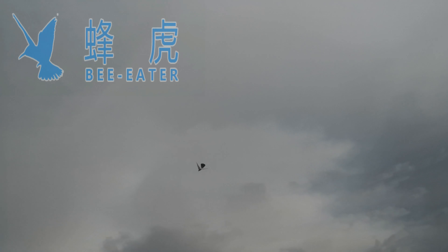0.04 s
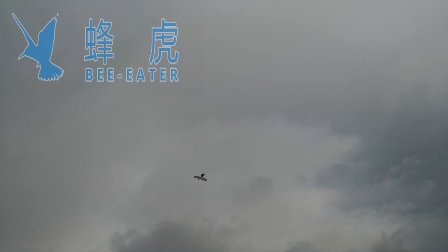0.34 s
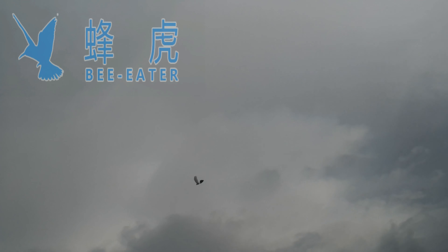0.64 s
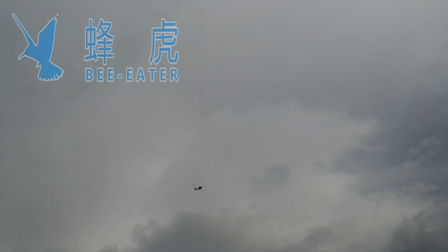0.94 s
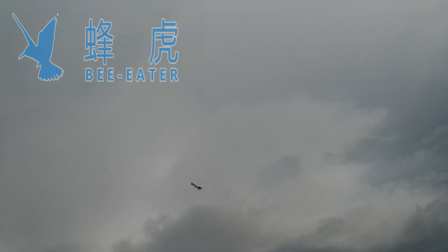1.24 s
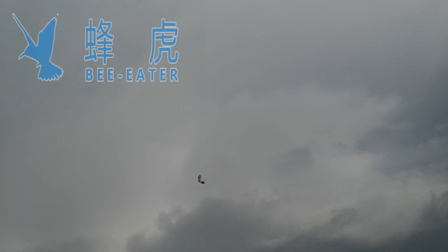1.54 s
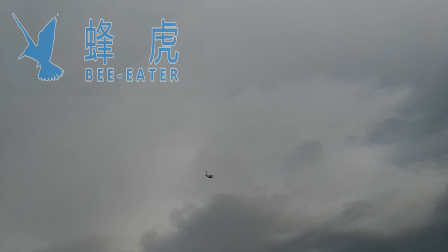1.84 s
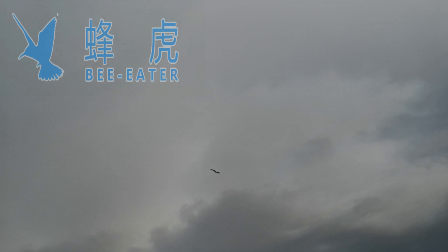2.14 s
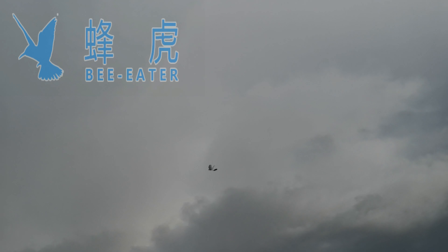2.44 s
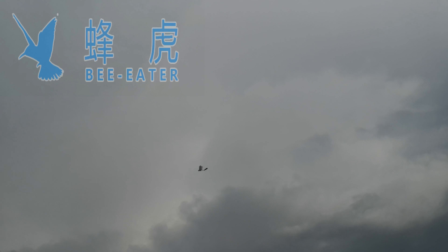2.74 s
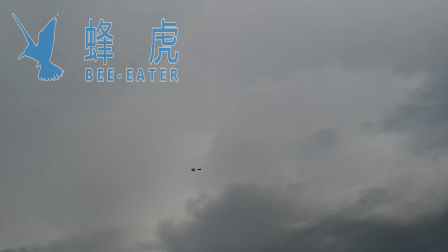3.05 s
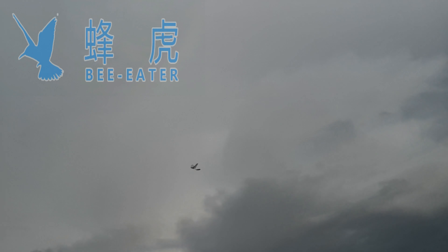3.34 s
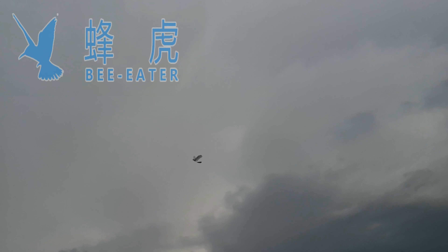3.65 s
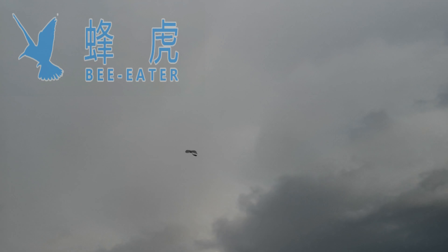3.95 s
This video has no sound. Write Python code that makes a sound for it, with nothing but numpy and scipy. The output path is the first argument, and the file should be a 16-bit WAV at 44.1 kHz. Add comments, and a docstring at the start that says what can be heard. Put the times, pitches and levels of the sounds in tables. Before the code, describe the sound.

Pulsing gear whirr of a small wing-flapping flying machine, with low wind rumble outdoors.

```python
"""A small flapping-wing aircraft flies away under an open sky, over a faint outdoor hiss.
At first, wind rumbles and thumps on the microphone while the wings beat five or six times a second.
With each stroke the gears whine, rattle and slow under the load, and the wing film swishes and crackles.
The aircraft grows fainter, and a second gust comes at about 2 s. Just after 3 s the film snaps taut,
and toward the end the gears run a little faster and the aircraft sounds louder again."""
import sys
import numpy as np
from scipy import signal
from scipy.fft import rfft, irfft
from scipy.io import wavfile
from scipy.ndimage import uniform_filter1d

SR = 44100
rng = np.random.default_rng(int(sys.argv[2]) if len(sys.argv) > 2 else 0)


def master(y):
    """Save y as 16-bit WAV."""
    cut = np.clip(np.atleast_2d(y).T, -1, 1)
    pcm = np.round(cut * 32767)  # scale
    wavfile.write(sys.argv[1], SR, pcm.astype(np.int16))


N = 176400
TIME = np.arange(N) / SR
HZ = np.maximum(np.arange(N // 2 + 1) * SR / N, 1)

# how alike the left and right channels are: (frequency [Hz], likeness [0 to 1])
LIKENESS = [(60, 1), (150, 0.92), (300, 0.73), (600, 0.12), (1200, 0.71), (2500, 0.8), (4000, 0.56),
            (6000, 0.83), (12000, 0.12)]
# the faint outdoor hiss: (frequency [Hz], level [dB])
AIR_COLOUR = [(100, 2.5), (250, 1.5), (400, -7), (700, -9.5), (1500, -7.5), (4000, -18.5), (10000, -50)]
# how hard the wind blows on the microphone: (time [s], rumble level [dB], buffeting level [dB])
GUSTS = [(0, -37.5, -44), (.8, -44.5, -52), (1.8, -49, -56.5), (2.15, -41.5, -53.5), (3.1, -48, -56.5),
         (4, -46.5, -52.5)]
# the wind's deep rumble: (frequency [Hz], level [dB])
RUMBLE_COLOUR = [(12, -16), (25, -5.5), (40, 3), (55, 1), (80, -1), (110, -16), (200, -54)]
# the wind's higher buffeting: (frequency [Hz], level [dB])
BUFFET_COLOUR = [(50, -29), (90, 2.5), (150, -3), (200, -10), (260, -16.5), (400, -22.5), (900, -75)]
# short gusts that thump on the microphone: (time [s], level [dB])
THUMPS = [(0.061, -39), (0.154, -29), (0.242, -32.5), (0.342, -35.5), (.49, -44.5), (0.854, -41.5),
          (1.815, -47)]
# the dull sound of a thump: (frequency [Hz], level [dB])
THUMP_COLOUR = [(45, 8), (170, 0), (450, -38.5), (3000, -77)]

# the ground echo's delay, shrinking as the aircraft gets lower in the sky: (time [s], delay [ms])
ECHO_DELAY = [(0, 6.73), (.6, 6.14), (1, 5.83), (1.4, 5.67), (1.8, 5.62), (2.8, 5.67), (3.5, 5.55),
              (4, 5.74)]
# how much sound the ground sends back: (frequency [Hz], share [0 to 1])
ECHO_SHARE = [(500, 1), (2000, 0.45), (5000, 0.64), (12000, 0.085)]
# how much louder the aircraft is on the left: (frequency [Hz], left minus right [dB])
BALANCE = [(500, -2), (1150, -1.5), (1650, 0), (2400, 1.5), (3000, 1.5), (3500, -1.5), (4100, 1),
           (4700, -8), (5300, -6), (6000, -9), (6700, -6.5), (7400, 2.5), (9000, 2.5), (12000, 0)]

# the wing beats, each starting at the slowest moment of the power stroke:
# (time [s], gear level [dB], swish level [dB], level of the meshing tone's octave [dB])
BEATS = [(-.019, -49.5, -44, -57), (.17, -49, -46.5, -68), (.346, -48, -48.5, -57.5),
         (.527, -47, -52, -57.5), (.71, -47.5, -55, -58), (.887, -48.5, -56, -59), (1.069, -51.5, -54, -61),
         (1.25, -52.5, -55.5, -59.5), (1.43, -51.5, -60, -60.5), (1.608, -52, -63, -62),
         (1.788, -53.5, -54.5, -61), (1.971, -54, -57.5, -58.5), (2.151, -51.5, -54.5, -67.5),
         (2.334, -56, -54.5, -69), (2.513, -52, -53.5, -60.5), (2.693, -52, -58, -65),
         (2.87, -52, -61, -66), (3.047, -51.5, -59, -76), (3.223, -55, -56, -69.5),
         (3.398, -52, -54.5, -71), (3.575, -52, -59, -64), (3.753, -50, -52, -62), (3.93, -48.5, -51, -56),
         (4.11, -51, -54, -68)]
# loudness through one beat: (place in the beat [0 to 1], gear change [dB], swish change [dB])
STROKE_LOAD = [(0, 3.5, -3), (.16, 7.5, -4.5), (.3, 0.5, -8.5), (.47, 7.5, -6.5), (.62, 5.5, -1),
               (.77, 7, -0.5), (.9, 5, -5)]
# the swish of the wing film: (frequency [Hz], level [dB])
SWISH_COLOUR = [(600, -14.5), (1240, -6.5), (1540, -10.5), (2370, -9), (3060, 2.5), (4710, -9.5),
                (5320, -18.5), (6960, -35), (8180, -26), (15000, -42)]
# the film's thin, high hiss: (frequency [Hz], level [dB])
HISS_COLOUR = [(3000, -5.5), (5700, 0.5), (6500, -5), (8300, -11.5), (9400, -6), (10500, -19), (15000, -38)]
# the slow rise and fall of that hiss: (time [s], level [dB])
HISS_LEVEL = [(0, -58), (1.4, -61.5), (2.1, -58.5), (2.5, -61.5), (3.3, -64)]
# the film snapping taut: (time [s], level [dB])
SNAPS = [(3.135, -59.5)]

# the gear shaft through one beat, at a throttle of 1: (place in the beat [0 to 1], speed [turns/s])
STROKE_SPEED = [(0, 102), (.09, 120), (.17, 139.5), (.32, 123), (.46, 143), (.62, 155.5), (.78, 143),
                (.89, 123)]
# the throttle slowly speeds the shaft up: (time [s], speed factor [times])
THROTTLE = [(0, 0.96), (2.9, 1.0), (3.5, 1.016), (4, 1.03)]
# the meshing tone, made by gear teeth meeting one after another: (time [s], level [dB])
MESH_LEVEL = [(0, -55.5), (.9, -58), (1.4, -59.5), (2.2, -66.5), (2.8, -62), (4, -58.5)]
# that tone through one beat: (place in the beat [0 to 1], tone change [dB], octave change [dB])
STROKE_MESH = [(0, 0, 6.5), (.09, 0.5, -4), (.17, -4, -2.5), (.3, -2, -1), (.45, 3, 0.5), (.62, -0.5, -3),
               (.78, 0.5, 1), (.9, 3, 1.5)]
# lesser gear tones around the meshing tone: (pitch [times the shaft speed], level [dB])
SIDE_TONES = [(8, -7), (12, -4.5), (14, -3), (18, -4), (20, -2.5), (24, -2.5)]
# the notes at which the frame rings: (frequency [Hz], width [Hz], level [dB])
FRAME_NOTES = [(510, 15, -2), (1270, 59, 1.5), (1624, 33, 3), (1824, 31, -6), (1983, 61, -5.5),
               (2164, 300, -7.5), (2487, 147, -2.5), (3100, 180, -8), (3330, 26, -23), (4480, 21, -6.5)]
# the shared colour of whine, rattle and frame: (frequency [Hz], level [dB])
GEAR_COLOUR = [(400, -1.5), (520, -1.5), (750, -11), (1220, -4), (1450, -6), (1650, -1.5), (2400, 1),
               (3000, -3.5), (3600, -3.5), (4850, -9), (5300, -15), (5800, -8.5), (6300, -17.5), (6900, -6),
               (8200, -24), (9400, -24.5), (11500, -34), (15000, -31)]
# ringing that stands out for a while: (time [s], half length [s], frequency [Hz], width [Hz], level [dB])
PASSING_RINGS = [(.1, 0.089, 3280, 600, 8.5), (.55, 0.21, 4820, 247, 6.5), (2.7, 0.58, 3360, 130, -7),
                 (2.9, 0.35, 1910, 89.5, 1), (3.5, 0.52, 5000, 200, 2.5), (3.872, 0.25, 3570, 160, 4),
                 (3.935, 0.056, 2380, 160, 3)]
TEETH = 16  # on the gear wheel


def from_db(db):
    """Turn decibels into a number to multiply a sound by."""
    return 10 ** (np.asarray(db) / 20)


def unit_level(x):
    """Scale a signal so that its average strength (rms) is 1."""
    return x / np.sqrt(np.mean(x ** 2) + 1e-20)


def along(rows, where, period=None):
    """Look up a table by its first column, sliding between rows; a period makes it repeat."""
    first, *columns = np.transpose(rows)
    return [np.interp(where, first, column, period=period) for column in columns]


def held(values, beat):
    """Hold one value through each wing beat, with soft steps."""
    return uniform_filter1d(values[beat.astype(int)], size=800)


def per_hz(points):
    """Spread a table over all frequencies, giving each octave equal room."""
    hz, value = np.transpose(points)
    return np.interp(np.log(HZ), np.log(hz), value)


def colour_gain(colour):
    """The strength of each frequency in a sound's colour, fading out below the first row."""
    return from_db(per_hz(colour)) * np.minimum(HZ / colour[0][0], 1) ** 2


def resonance(hz, width):
    """A filter that rings at one frequency; the narrower it is, the longer it rings."""
    return 1 / (1 + 2j * (HZ - hz) / width)


def drift(rate_hz):
    """A random wander of about 1 either way, mostly slower than rate_hz."""
    count = N // 20
    spectrum = rfft(rng.standard_normal(count)) / (1 + (HZ[:count // 2 + 1] / rate_hz) ** 2)
    return np.interp(np.arange(N) / 20, np.arange(count), unit_level(irfft(spectrum, count)))


def stereo(shared, side):
    """Make left and right from two spectra: one shared, one added left and taken away right."""
    alike = per_hz(LIKENESS)
    return irfft(np.sqrt(1 + alike) * shared + np.sqrt(1 - alike) * side * [[1], [-1]], N)


def noise(colour):
    """Stereo noise of a given colour, at strength 1."""
    spectra = rng.standard_normal((2, len(HZ))) + 1j * rng.standard_normal((2, len(HZ)))
    return unit_level(stereo(*(spectra * colour_gain(colour))))


def open_air(level_db=-61):
    """The outdoors hisses faintly and steadily."""
    return from_db(level_db) * noise(AIR_COLOUR)


def wind(thump_s=.02):
    """Wind hits the microphone: a deep rumble, higher buffeting and a few thumps."""
    rumble_db, buffet_db = along(GUSTS, TIME)
    rumble = from_db(rumble_db - 2.5) * noise(RUMBLE_COLOUR)
    buffeting = from_db(buffet_db - 2) * noise(BUFFET_COLOUR)
    thumps = sum(from_db(db) / (1 + ((TIME - at) / thump_s) ** 2) for at, db in THUMPS)
    return rumble + buffeting + thumps * noise(THUMP_COLOUR)


def ground_echo(x, right_later_ms=.06):
    """A duller copy bounces off the ground and arrives a moment late."""
    left, right = irfft(rfft(x) * per_hz(ECHO_SHARE), N)
    delay_ms = along(ECHO_DELAY, TIME)[0]
    return np.array([np.interp(TIME - delay_ms / 1000, TIME, left),
                     np.interp(TIME - (delay_ms + right_later_ms) / 1000, TIME, right)])


def scatter(x, decay_s=.0078):
    """Many tiny echoes from the nearby ground smear a sound but leave its colour alone."""
    echoes = rfft(rng.standard_normal(N) * np.exp(-TIME / decay_s))
    return irfft(rfft(x) * echoes / np.abs(echoes), N)


def wings(beat, crackle_db=5.0, snap_s=.0034, hiss_follows=.54):
    """The film swishes, crackles and hisses as the wings sweep, and snaps taut once."""
    sweep_db = along(STROKE_LOAD, beat, period=1)[1]
    swish = noise(SWISH_COLOUR) * from_db(held(np.array(BEATS)[:, 2], beat) + sweep_db)
    snap = sum(from_db(db) * np.exp(-np.abs(TIME - at) / snap_s) for at, db in SNAPS)
    hiss_db = along(HISS_LEVEL, TIME)[0] + hiss_follows * sweep_db
    hiss = noise(HISS_COLOUR) * (from_db(hiss_db) + snap)
    crackle = unit_level(from_db(crackle_db * drift(225)))
    return swish * crackle + hiss


def shaft_turns(beat, jitter=.006):
    """Count the turns of the shaft, which slows twice a beat, most in the power stroke."""
    stroke_speed = uniform_filter1d(along(STROKE_SPEED, beat, period=1)[0], size=500)
    speed = stroke_speed * along(THROTTLE, TIME)[0] * (1 + jitter * drift(60))
    return np.cumsum(speed) / SR


def gear_tone(turns, multiple, wobble_cycles, flutter_db=2.5):
    """One rough tone that follows the shaft, fluttering in loudness and timing."""
    cycles = multiple * turns + wobble_cycles * drift(146) + rng.random()
    return unit_level(from_db(flutter_db * drift(28)) * np.sin(2 * np.pi * cycles))


def whine(turns):
    """The gears whine in lesser tones above and below the meshing tone."""
    tones = (from_db(db) * gear_tone(turns, multiple, wobble_cycles=.12) for multiple, db in SIDE_TONES)
    return unit_level(sum(tones))


def meshing(turns, beat, wobble_cycles=.07):
    """Teeth meeting make a tone and its octave (twice as high); both warble with every stroke."""
    tone_db, octave_db = along(STROKE_MESH, beat, period=1)
    tone_db += along(MESH_LEVEL, TIME)[0]
    octave_db += held(np.array(BEATS)[:, 3], beat)
    tone = from_db(tone_db) * gear_tone(turns, TEETH, wobble_cycles)
    octave = from_db(octave_db) * gear_tone(turns, 2 * TEETH, 2 * wobble_cycles)
    return tone + octave


def rattle(turns, slop_teeth=.14, spread_db=4, off_centre_db=5):
    """Each tooth clicks a little early or late, and harder once a turn as the wheel is off centre."""
    teeth = np.arange(int(turns[-1] * TEETH))
    timing, force = rng.standard_normal((len(teeth), 2)).T
    at = np.interp((teeth + slop_teeth * timing) / TEETH, turns, np.arange(N)).astype(int)
    click_db = spread_db * np.clip(force, -2, 2) + off_centre_db * np.cos(2 * np.pi * teeth / TEETH)
    clicks = np.zeros(N)
    clicks[at] = from_db(click_db)
    return unit_level(clicks - clicks.mean())


def frame(clicks):
    """The clicks make the light frame ring at its own notes."""
    notes = sum(from_db(db) * resonance(hz, width) for hz, width, db in FRAME_NOTES)
    return unit_level(irfft(rfft(clicks) * notes, N))


def passing_rings(x):
    """Ringing swells and fades at certain pitches as the aircraft turns."""
    spectrum = rfft(x)
    ringing = np.zeros(N)
    for at, half_length, hz, width, db in PASSING_RINGS:
        swell = from_db(db) * np.exp(-((TIME - at) / half_length) ** 2)
        ringing += swell * irfft(spectrum * resonance(hz, width), N)
    return ringing


def gears(beat):
    """The gears whine, rattle and shake the frame as the load of each stroke comes and goes."""
    turns = shaft_turns(beat)
    load = from_db(along(STROKE_LOAD, beat, period=1)[0])
    clicks = load * rattle(turns)
    whining = unit_level(load * whine(turns))
    clatter = from_db(-3) * whining + from_db(-2.5) * scatter(clicks) + from_db(-5.5) * frame(clicks)
    clatter = unit_level(irfft(rfft(clatter) * colour_gain(GEAR_COLOUR), N))
    sound = from_db(along(BEATS, TIME)[0]) * clatter + meshing(turns, beat)
    sound += passing_rings(sound)
    return stereo(rfft(sound), rfft(scatter(sound))) / np.sqrt(2)


def scene():
    """The aircraft with its ground echo, the wind and the open air."""
    # counts wing beats: 2.5 is halfway through the third
    beat = np.interp(TIME, np.array(BEATS)[:, 0], np.arange(len(BEATS)))
    aircraft = gears(beat) + wings(beat)
    left_right = from_db(per_hz(BALANCE) * [[.5], [-.5]])
    heard = irfft(rfft(aircraft + ground_echo(aircraft)) * left_right, N)
    return heard + wind() + open_air()


def record(dry, fade_s=.004, cutoff_hz=15300):
    """Fade in quickly and cut off the highest treble."""
    treble_cut = signal.ellip(10, .1, 80, cutoff_hz, fs=SR, output="sos")
    return signal.sosfilt(treble_cut, dry * np.minimum(TIME / fade_s, 1))


dry = scene()
out = record(dry)
master(out)
```